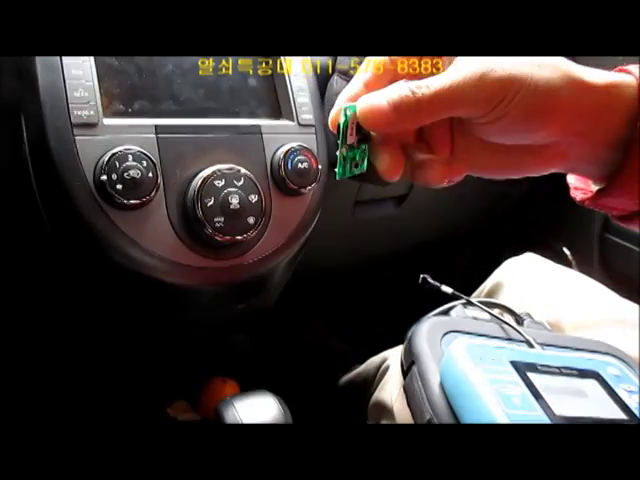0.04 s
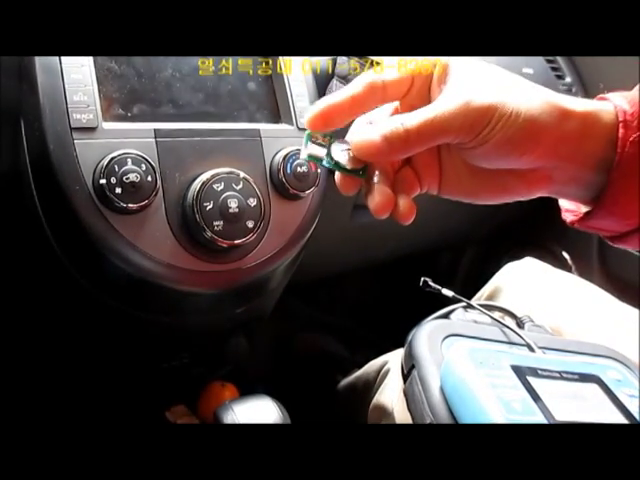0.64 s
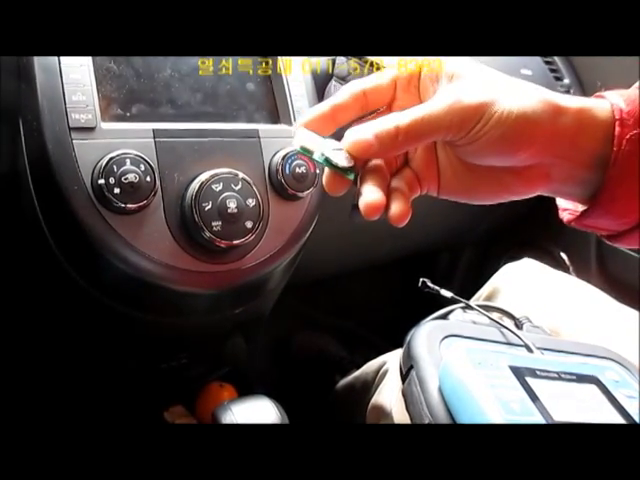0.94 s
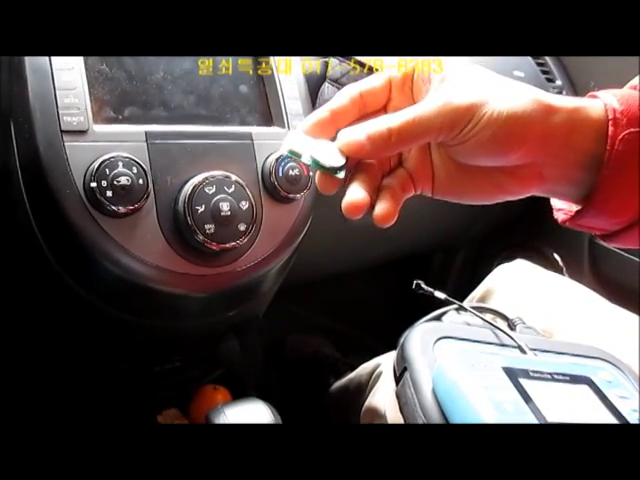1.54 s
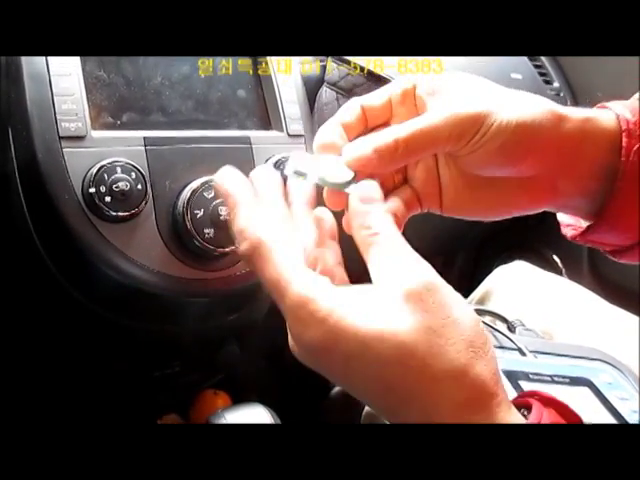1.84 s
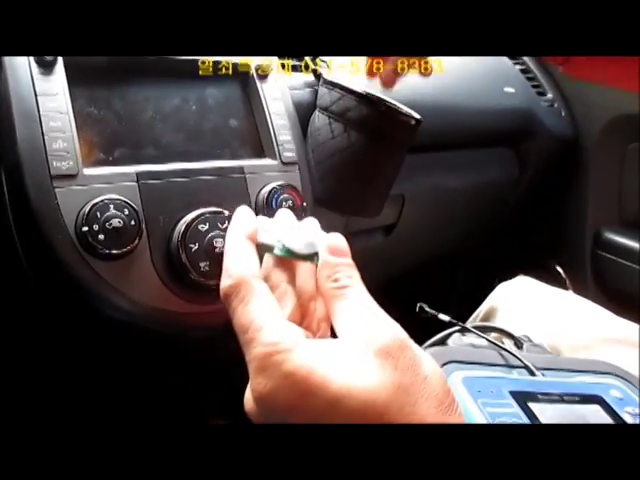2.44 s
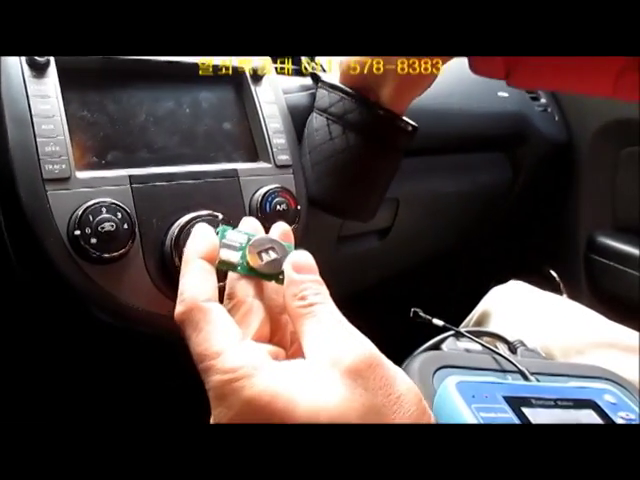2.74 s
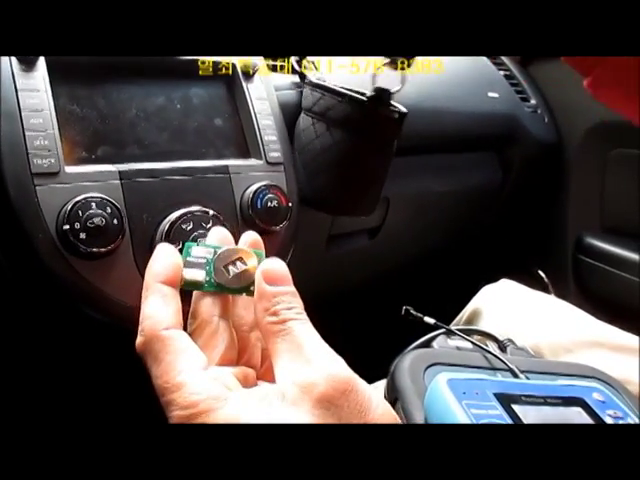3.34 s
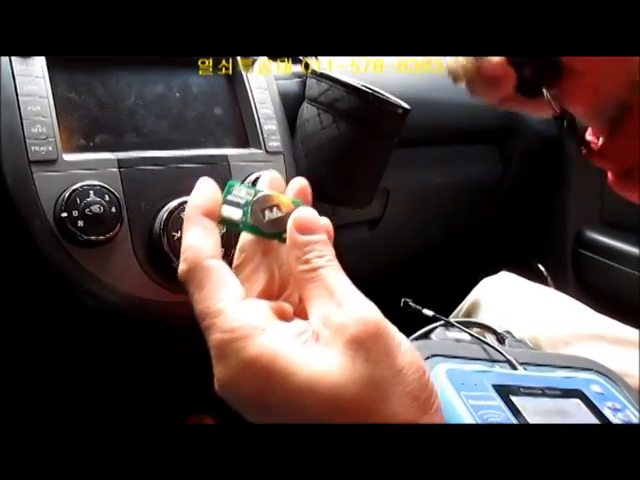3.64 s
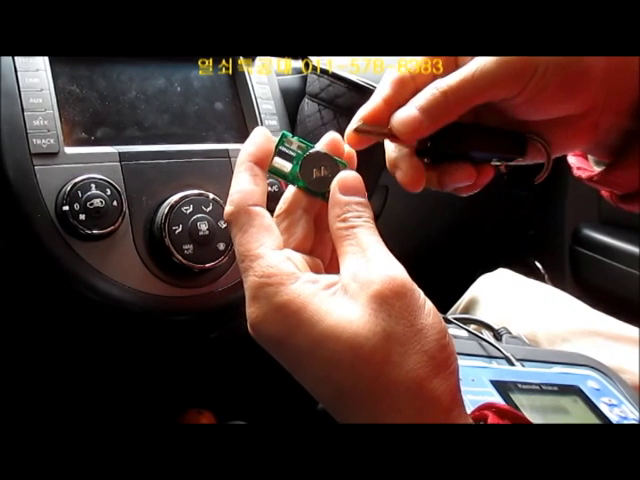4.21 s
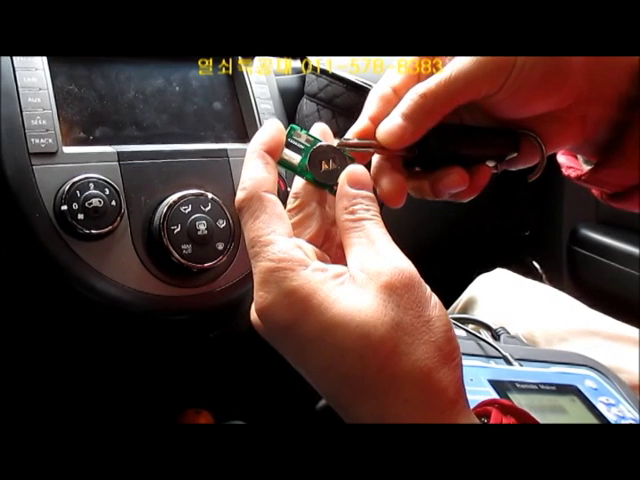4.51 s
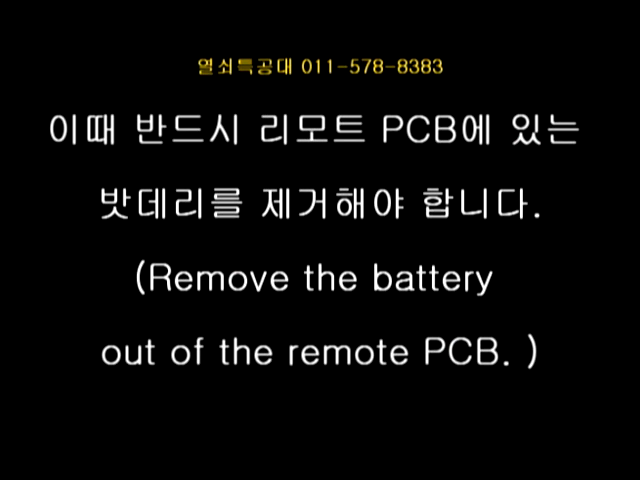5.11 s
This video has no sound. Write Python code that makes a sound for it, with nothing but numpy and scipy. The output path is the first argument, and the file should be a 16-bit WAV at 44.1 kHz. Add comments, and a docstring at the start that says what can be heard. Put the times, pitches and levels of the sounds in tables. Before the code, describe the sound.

A plastic key fob shell snaps once amid sleeve rustle, followed by rummaging in a pouch and a metal key clicking lightly.

```python
"""A remote key fob is handled in a parked car: its hollow plastic shell snaps down once, cracking and ringing.
A key clicks against the case and circuit board, ringing the plastic and its own steel blade.
Hands bump the dashboard and rummage in a pouch; fingertips and jacket sleeves stick and slip.
The cabin rumbles faintly, with a thin electronic whine, until the sound is switched off."""
import sys
import numpy as np
from scipy import signal
from scipy.fft import rfft, irfft, next_fast_len
from scipy.io import wavfile

SR = 44100
rng = np.random.default_rng(int(sys.argv[2]) if len(sys.argv) > 2 else 0)


def dump(signal):
    """Clip the signal to [-1, 1] and save it as 16-bit WAV at the path in sys.argv[1]."""
    limited = np.clip(np.atleast_2d(signal).T, -1, 1)
    pcm = np.round(limited * 32767).astype(np.int16)
    wavfile.write(sys.argv[1], SR, pcm)


N = 236861
TIME = np.arange(N) / SR
AGE = TIME[:SR // 6]   # time since a blow


def from_db(db):
    """Decibels to gain."""
    return 10 ** (np.asarray(db) / 20)


def unit_rms(x):
    """Scale to rms 1."""
    return x / np.sqrt(np.mean(x ** 2) + 1e-20)


def unit_blow(x):
    """Scale to the energy of 10 ms at rms 1, the 0 dB of all blows."""
    return x / np.sqrt(np.sum(x ** 2) / (SR / 100))


def db_at(spectrum, hz):
    """Read a spectrum on a log-frequency axis."""
    points_hz, db = np.transpose(spectrum)
    return np.interp(np.log(np.maximum(hz, 1)), np.log(points_hz), db)


def add(out, time_s, sound):
    """Mix a sound in at time_s."""
    start = round(time_s * SR)
    out[start:start + len(sound)] += sound[:N - start]


def drift(rate_hz):
    """Low-passed random wander, rms 1."""
    step, settle = 40, 2000
    pole = np.exp(-2 * np.pi * rate_hz * step / SR)
    white = rng.standard_normal(N // step + settle + 2)
    slow = signal.lfilter([1], [1, -2 * pole, pole * pole], white)[settle:]
    return np.interp(np.arange(N) / step, np.arange(len(slow)), unit_rms(slow))


def noise(spectrum):
    """Steady coloured noise, rms 1."""
    size = next_fast_len(N)
    gain = from_db(db_at(spectrum, np.arange(size // 2 + 1) * SR / size))
    return unit_rms(irfft(rfft(rng.standard_normal(size)) * gain, size)[:N])


def band(x, low_hz, high_hz):
    """Band-pass, rms 1."""
    return unit_rms(signal.sosfilt(signal.butter(2, [low_hz, high_hz], "band", fs=SR, output="sos"), x))


def swells(slides, block=16, roundness=1.38):
    """Power over time, a row per slide; 10 dB down at one rise before the peak and one fall after."""
    peak_s, db, rise_s, fall_s = np.transpose(slides)[:4, :, None]
    away = np.maximum((peak_s - TIME[::block]) / rise_s, (TIME[::block] - peak_s) / fall_s)
    power = from_db(np.maximum(db - 10 * away ** roundness, -200)) ** 2
    return np.repeat(power, block, axis=1)[:, :N]


def friction(slides, hz, width_hz, grain_db):
    """A surface sticks and slips, exciting one resonance."""
    slips = rng.standard_normal(N) * from_db(grain_db * drift(200))
    return np.sqrt(swells(slides).sum(axis=0)) * band(slips, hz - width_hz / 2, hz + width_hz / 2)


def decay(t60_s):
    """Exponential decay after a blow."""
    return np.exp(-np.log(1000) * AGE / t60_s)


def ring(modes, scatter_db, rise_cycles, detune=0):
    """A struck body: each blow gives the modes new strengths; the grip detunes them slightly."""
    hz, db, t60_s = np.transpose(modes)[:, :, None]
    strength = from_db(db + scatter_db * rng.standard_normal(hz.shape)) * rng.choice([-1, 1], hz.shape)
    cycles = hz * np.exp(detune * rng.standard_normal(hz.shape)) * AGE
    build_up = 1 - np.exp(-cycles / rise_cycles)
    return unit_blow(np.sum(strength * np.sin(2 * np.pi * cycles) * decay(t60_s) * build_up, axis=0))


def struck_near(modes, centre_hz, octaves):
    """Where a blow lands decides which modes answer most."""
    return [(hz, db - 4 * (np.log2(hz / centre_hz) / octaves) ** 2, t60_s) for hz, db, t60_s in modes]


def crack(spectrum, t60_s, tail_db, tail_t60_s):
    """Crowded high modes: a coloured noise burst with a weaker, longer tail."""
    burst = rng.standard_normal(len(AGE)) * (decay(t60_s) + from_db(tail_db) * decay(tail_t60_s))
    hz = np.abs(np.fft.fftfreq(len(AGE), 1 / SR))
    log_gain = np.log(from_db(db_at(spectrum, hz)))
    colour = np.exp(np.conj(signal.hilbert(log_gain)))   # minimum phase: silent before the blow
    return unit_blow(np.fft.ifft(np.fft.fft(burst) * colour).real)


# cabin spectrum (frequency [Hz], density [dB])
CABIN_SPECTRUM = [(20, -8.5), (43, 0.5), (77, -10.5), (120, -11.5), (200, -17), (310, -20.5), (400, -23),
                  (700, -24), (1200, -24), (2600, -39), (5000, -39.5), (7700, -41.5), (11000, -51),
                  (16000, -54.5)]
# whine partials (multiple of the base [1], level [dB])
WHINE_PARTIALS = [(2, -78.5), (3, -85)]
def cabin(rumble_db=-52, whine_base_hz=3932, waver_hz=6):
    """Rumble, hiss and a thin electronic whine that wavers in pitch."""
    phase = 2 * np.pi * np.cumsum(whine_base_hz + waver_hz * drift(25)) / SR
    whine = sum(from_db(db) * np.sqrt(2) * np.sin(multiple * phase) for multiple, db in WHINE_PARTIALS)
    return from_db(rumble_db) * noise(CABIN_SPECTRUM) + whine


def reflections(x, level_db, t60_s, first_s):
    """Windscreen and dashboard return a brief scatter that the seats absorb."""
    scatter = rng.standard_normal(len(AGE)) * decay(t60_s) * (AGE > first_s)
    return from_db(level_db) * signal.fftconvolve(x, scatter / np.sqrt(np.sum(scatter ** 2)))[:N]


# sleeve swishes (peak [s], level [dB], rise [s], fall [s], tilt [dB/octave])
ARM_MOVES = [(0.0, -44.5, .05, 0.1, -1), (0.124, -42.5, 0.11, .11, 0), (0.31, -45.5, 0.032, 0.055, 0),
             (0.41, -49.5, 0.095, 0.12, -2.5), (0.51, -43, .035, 0.018, 2.5), (0.62, -49, 0.07, 0.02, -0.5),
             (0.71, -51.5, 0.044, 0.052, 0), (0.975, -53.5, 0.16, .11, -2), (1.33, -65, 0.071, 0.12, 1),
             (1.55, -44.5, 0.042, 0.11, -1), (1.66, -42, 0.12, 0.13, -0.07),
             (1.98, -54.5, 0.13, 0.095, -.5), (2.19, -53.5, 0.13, 0.092, -1.5),
             (2.37, -50.5, 0.18, 0.11, -.2), (2.52, -48, 0.09, 0.028, 0), (2.65, -52.5, 0.089, .08, -0.3),
             (2.77, -51, 0.043, 0.028, -2), (3.03, -50.5, 0.13, 0.14, -1.5), (3.205, -47, 0.055, 0.081, 0),
             (3.36, -51.5, .05, .08, -3.5), (3.57, -51.5, 0.36, 0.1, 0.6), (3.81, -53, 0.36, .22, -2),
             (4.49, -55.5, 0.022, 0.056, 2)]
def arm_motion(rest_db=-64, rest_db_per_oct=-0.54):
    """Sleeve level and tilt over time: swishes add in power, the strongest sets the colour."""
    power, rest = swells(ARM_MOVES), from_db(rest_db) ** 2
    total = power.sum(axis=0) + rest
    tilt_db_per_oct = (np.transpose(ARM_MOVES)[-1] @ power + rest_db_per_oct * rest) / total
    return 10 * np.log10(total), tilt_db_per_oct


# jacket cloth spectrum (frequency [Hz], density [dB])
CLOTH_SPECTRUM = [(200, -16.5), (380, -2), (560, 4), (1000, 0.5), (2100, -2), (3300, -5), (5400, -10.5),
                  (8000, -15), (11000, -31.5), (16000, -31.5)]
def sleeves(level_db, tilt_db_per_oct, grain_db=1.0, patchy_db=1.47):
    """Countless threads catch and slip; each band flickers on its own."""
    slips = rng.standard_normal((2, N)) * from_db(grain_db * drift(350))
    edges_hz = np.geomspace(250, 16000, num=13)
    out, power = 0, 0
    for k, (low, high) in enumerate(zip(edges_hz, edges_hz[1:])):
        hz = np.sqrt(low * high)
        density_db = db_at(CLOTH_SPECTRUM, hz) + tilt_db_per_oct * np.log2(hz / edges_hz[0])
        gain = np.sqrt(high - low) * from_db(density_db)
        out += gain * band(slips[k % 2], low, high) * from_db(patchy_db * drift(25))
        power += gain ** 2
    return from_db(level_db) * out / np.sqrt(power)


# new grips, board-edge rubs, pouch-wall drags (peak [s], level [dB], rise [s], fall [s])
GRIPS = [(0.0, -46, .05, 0.15), (0.37, -48.5, 0.29, 0.1), (0.61, -52, .05, 0.086), (0.81, -54, 0.16, 0.15),
         (1.0, -49, 0.062, .07), (2.46, -59, 0.27, 0.14)]
BOARD_RUBS = [(0.345, -52, .06, .07), (0.505, -47, 0.063, 0.017), (0.62, -54, 0.046, 0.0083),
              (0.965, -61, 0.021, .045)]
POUCH_DRAGS = [(2.962, -52, .012, 0.026), (3.015, -40.5, 0.012, 0.011), (3.1, -45.5, 0.029, 0.015)]
# hand scuff spectrum (frequency [Hz], density [dB])
SCUFF_SPECTRUM = [(70, -19), (160, -10), (230, 4), (300, 3.5), (420, -12), (700, -50.5)]
def fingers(sleeve_db, scuff_re_sleeve_db=-10.5):
    """Fingertips rub the board and drag things in the pouch; hands scuff as they regrip or arms move."""
    scuff_power = swells(GRIPS).sum(axis=0) + from_db(sleeve_db + scuff_re_sleeve_db) ** 2
    rub = friction(BOARD_RUBS, hz=2880, width_hz=690, grain_db=1.5)
    drag = friction(POUCH_DRAGS, hz=1133, width_hz=100, grain_db=6.5)
    return rub + drag + np.sqrt(scuff_power) * noise(SCUFF_SPECTRUM)


# pouch and contents modes (frequency [Hz], gain [dB], t60 [s])
POUCH_THUD_MODES = [(128, -0.5, 0.051), (173, -5, 0.041), (237, -1, 0.03), (332, -12, 0.021)]
POUCH_KNOCK_MODES = [(502, -9, 0.056), (675, -3, 0.033), (736, -5, 0.027), (920, -2, 0.021),
                     (1114, -6, 0.03), (1300, -2.5, 0.016)]
# contact spectrum (frequency [Hz], density [dB])
POUCH_TICK_SPECTRUM = [(900, -30), (1500, 3), (2100, 8.5), (3600, 0.5), (5500, -10.5), (9000, -18.5),
                       (16000, -44)]
# blows in the pouch (time [s], thud [dB], knock [dB], tick [dB], knock centre [Hz])
POUCH_HITS = [(2.468, -42, -48, -59, 694), (2.5375, -51.5, -34, -41, 820), (2.678, -45.5, -45.5, -49, 875),
              (2.7055, -47.5, -33, -44, 910), (2.976, -42.5, -38, -55, 1170),
              (3.005, -46.5, -45.5, -47.5, 1150), (3.1829, -44, -39.5, -44, 885),
              (3.203, -45, -50, -67, 900), (3.2263, -37, -40.5, -39, 950), (3.2568, -34.5, -44.5, -63, 740),
              (3.3005, -35.5, -37.5, -49.5, 960)]
def rummage():
    """The padded pouch thuds while hard things in it knock together."""
    out = np.zeros(N)
    for time_s, thud_db, knock_db, tick_db, hz in POUCH_HITS:
        modes = struck_near(POUCH_KNOCK_MODES, hz, octaves=0.6)
        knock = ring(modes, scatter_db=2.5, rise_cycles=0.2, detune=0.025)
        thud = ring(POUCH_THUD_MODES, scatter_db=4, rise_cycles=0.42, detune=0.018)
        tick = crack(POUCH_TICK_SPECTRUM, t60_s=0.05, tail_db=-24, tail_t60_s=0.059)
        add(out, time_s, from_db(thud_db) * thud + from_db(knock_db) * knock + from_db(tick_db) * tick)
    return out


# dashboard modes (frequency [Hz], gain [dB], t60 [s])
DASH_THUD_MODES = [(108, -1, 0.1), (214.6, -1, 0.082), (251, -1.5, 0.064), (291.4, -1.5, .07)]
DASH_KNOCK_MODES = [(487, -7.5, 0.025), (550, 7.5, .025), (616, 7.5, .025), (780, -0.5, 0.053),
                    (1060, -5, 0.019)]
# hard touch spectrum (frequency [Hz], density [dB])
DASH_TICK_SPECTRUM = [(700, -19), (1200, 10.5), (2800, 5), (4000, -21.5), (6000, -12.5), (10000, -28.5),
                      (16000, -44)]
# hand and board bumps (time [s], thud [dB], knock [dB])
DASH_HITS = [(0.208, -32, -57), (0.2468, -35, -54), (0.2514, -29, -30.5), (0.319, -35.5, -65),
             (0.3325, -55, -44), (0.353, -35.5, -59), (0.381, -36.5, -53), (0.392, -36, -57),
             (0.427, -37.5, -65), (0.453, -52, -45), (0.511, -39, -51), (0.532, -40.5, -65),
             (0.572, -42, -74), (0.743, -39, -61), (0.986, -46, -74)]
def dashboard_bumps():
    """A soft blow thuds in the dashboard; a firmer one knocks and ticks."""
    out = np.zeros(N)
    for time_s, thud_db, knock_db in DASH_HITS:
        tick_db = -44 + 0.17 * knock_db
        knock = ring(DASH_KNOCK_MODES, scatter_db=2, rise_cycles=0.3, detune=0.02)
        thud = ring(DASH_THUD_MODES, scatter_db=1, rise_cycles=0.3, detune=0.04)
        tick = crack(DASH_TICK_SPECTRUM, t60_s=0.011, tail_db=-12.5, tail_t60_s=0.079)
        add(out, time_s, from_db(thud_db) * thud + from_db(knock_db) * knock + from_db(tick_db) * tick)
    return out


def jiggles(count=5, start_s=3.42, end_s=4.07, mean_db=-59, spread_db=3.5, blade_hz=2700):
    """Faint chance touches as the loose key is carried; rows as in KEY_HITS."""
    times_s = start_s + (end_s - start_s) * (np.arange(count) + rng.random(count)) / count
    levels_db = mean_db + spread_db * rng.standard_normal((count, 3))
    return [(time_s, *db, blade_hz) for time_s, db in zip(times_s, levels_db)]


# case, blade and high blade modes (frequency [Hz], gain [dB], t60 [s])
CASE_MODES = [(1967, 1, 0.023), (2064, 0.0018, 0.024), (2203, -0.5, 0.021)]
BLADE_MODES = [(2437, 2, 0.015), (2610, -9.5, 0.027), (2940, -2, 0.02), (3234, 1.5, 0.026),
               (3440, -4, 0.035), (3580, 10, 0.013)]
PING_MODES = [(4540, -5, .11), (6520, 6, .045), (7060, -5, 0.041), (7900, -2, .045), (8800, -3, .05),
              (10940, -17, .06)]
# key contact spectra (frequency [Hz], density [dB])
KEY_TICK_SPECTRUM = [(400, -32.5), (900, -12), (1500, -16.5), (3000, -4.5), (4500, 2), (5600, -1.5),
                     (7000, -1.5), (8500, -2.5), (10000, -16), (12000, -52.5)]
SPARKLE_SPECTRUM = [(8000, -19.5), (10400, 8.5), (12500, -5.5), (16000, 0)]
# key on case and board (time [s], case [dB], blade [dB], tick [dB], blade centre [Hz])
KEY_HITS = [(1.9961, -73, -72, -52, 2550), (3.1839, -62, -45, -53, 3320), (3.354, -55, -52.5, -62.5, 3000),
            (3.491, -49, -46, -58.5, 3000), (3.5604, -45, -49.5, -55, 2500), (3.605, -45, -52, -57, 2600),
            (3.6097, -36, -40.5, -47.5, 2550), (3.654, -46, -55, -71, 2400), (3.7064, -68, -69, -56, 3230),
            (3.8293, -51, -49, -65, 2470), (3.858, -42.5, -49, -47.5, 3240),
            (3.8664, -39.5, -36.5, -42.5, 2880), (3.872, -43.5, -44, -65, 2700),
            (3.8798, -56, -46, -50.5, 2740), (3.917, -57, -54, -72, 2600), (3.9448, -64, -53.5, -62, 2850),
            (4.03, -60, -54.5, -60, 2760), (4.182, -57.5, -35, -38, 2650), (4.4888, -43.5, -38, -41, 3160),
            (4.5104, -58, -50.5, -49, 2900), (4.66, -48.5, -53.5, -66, 2720),
            (4.717, -49, -49, -42.5, 3440)]
def key_clicks(firm_tick_db=-44.5, firm_sparkle_db=-55, sparkle_db_per_oct=33, ping_re_tick_db=-12.5):
    """Hard contacts tick and ring the plastic case and steel blade, damped fast by the fingers."""
    out = np.zeros(N)
    for time_s, case_db, blade_db, tick_db, hz in KEY_HITS + jiggles():
        # more sparkle from a firmer, shorter contact and from a higher ring
        sparkle_db = firm_sparkle_db + 1.2 * (tick_db - firm_tick_db)
        sparkle_db += sparkle_db_per_oct * np.log2(hz / 2890)
        case = ring(CASE_MODES, scatter_db=2.5, rise_cycles=0.2, detune=0.025)
        modes = struck_near(BLADE_MODES, hz, octaves=0.22)
        blade = ring(modes, scatter_db=1.5, rise_cycles=0.25, detune=0.012)
        ping = ring(PING_MODES, scatter_db=2, rise_cycles=0.3)
        tick = crack(KEY_TICK_SPECTRUM, t60_s=0.009, tail_db=-9, tail_t60_s=0.037)
        sparkle = crack(SPARKLE_SPECTRUM, t60_s=0.0033, tail_db=-21, tail_t60_s=0.045)
        add(out, time_s, from_db(case_db) * case + from_db(blade_db) * blade)
        add(out, time_s, from_db(tick_db) * (tick + from_db(ping_re_tick_db) * ping))
        add(out, time_s, from_db(sparkle_db) * sparkle)
    return out


# shell modes (frequency [Hz], gain [dB], t60 [s])
SHELL_MODES = [(530, 0, .052), (712, -6, .045), (850, -9, .034), (1245, 2, .026), (1484, -9, .04),
               (1622, -7, .04), (1779, -11, .04), (1997, -5.5, .035), (2167, -5, .04), (2433, -2, .035),
               (2766, -11, .033), (3218, -11, .038), (3700, -7, .026), (4964, -8.5, .04), (5399, -19, .035),
               (6470, -21, .04)]
# shell crack spectrum (frequency [Hz], density [dB])
CRACK_SPECTRUM = [(150, -21), (400, 1.5), (1000, -20.5), (2400, -8.5), (4000, -10), (5000, -2),
                  (7000, -14.5), (9500, -33.5), (16000, -40)]
# the snap (time [s], ring [dB], crack [dB])
SHELL_HIT = (.7337, -23, -31.5)
def shell_snap():
    """The hollow plastic shell snaps down, cracks and rings."""
    out = np.zeros(N)
    time_s, ring_db, crack_db = SHELL_HIT
    body = ring(SHELL_MODES, scatter_db=0.3, rise_cycles=1.3)
    contact = crack(CRACK_SPECTRUM, t60_s=0.024, tail_db=-26, tail_t60_s=0.051)
    add(out, time_s, from_db(ring_db) * body + from_db(crack_db) * contact)
    return out


def scene():
    """Mono mix; only the blows get reflections."""
    blows = shell_snap() + dashboard_bumps() + rummage() + key_clicks()
    sleeve_db, tilt_db_per_oct = arm_motion()
    rustle = sleeves(sleeve_db, tilt_db_per_oct) + fingers(sleeve_db)
    reflected = reflections(blows, level_db=-13.5, t60_s=0.084, first_s=0.002)
    return (blows + reflected + rustle + cabin())[None]


def record(dry):
    """Switch-off near the end, then a steep low-pass."""
    off_s, fade_s, cutoff_hz = 4.914, 0.0042, 15850
    gate = np.clip((off_s - TIME) / fade_s, 0, 1)
    return signal.sosfilt(signal.ellip(10, 0.1, 80, cutoff_hz, fs=SR, output="sos"), dry * gate)


dry = scene()
out = record(dry)
dump(out)
```